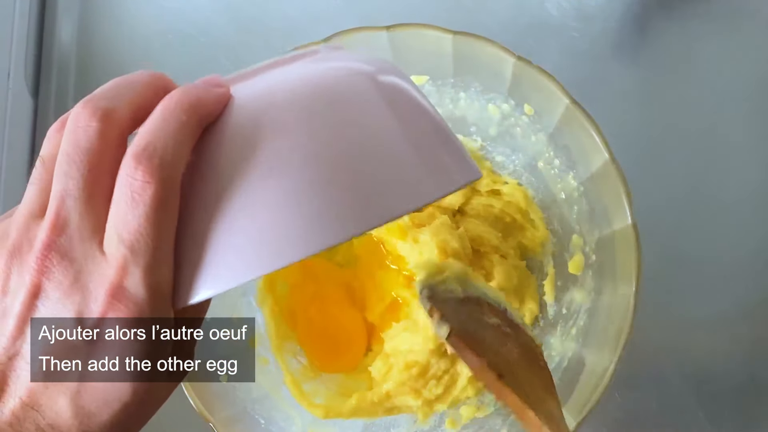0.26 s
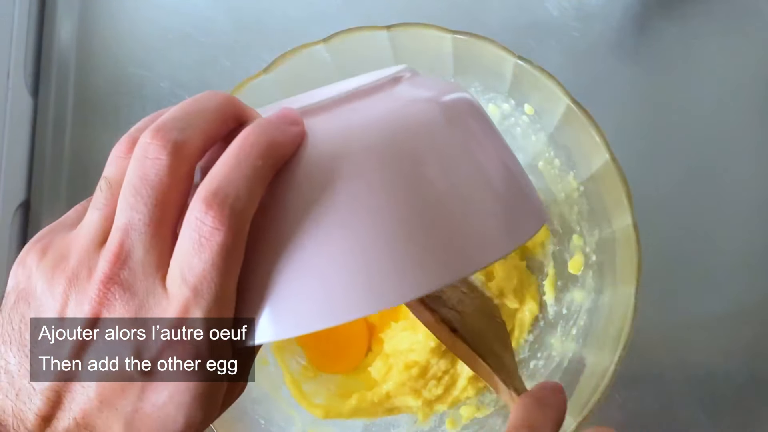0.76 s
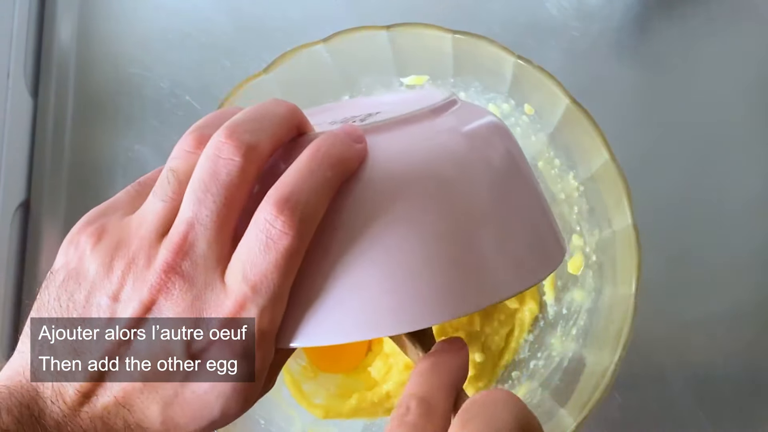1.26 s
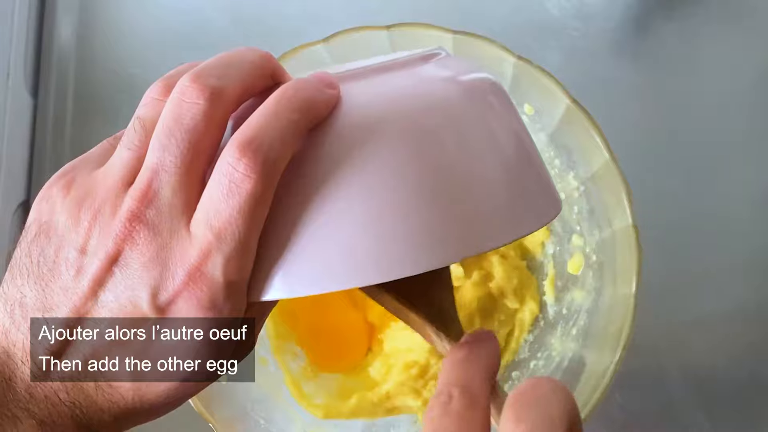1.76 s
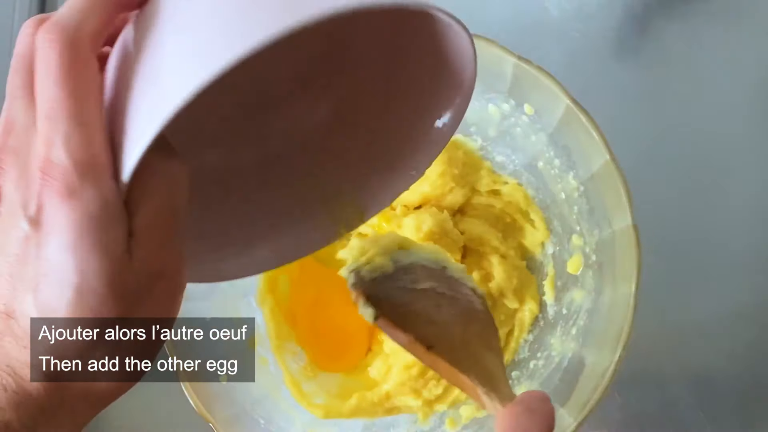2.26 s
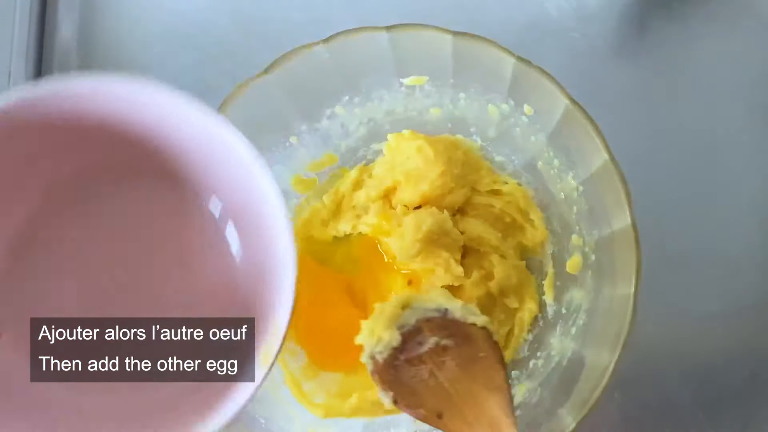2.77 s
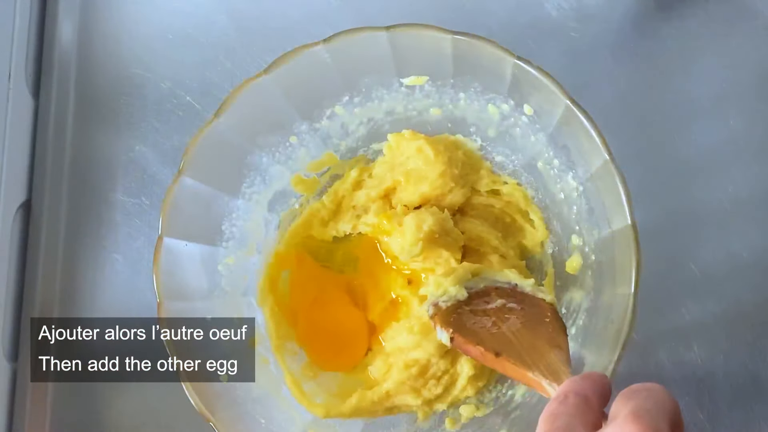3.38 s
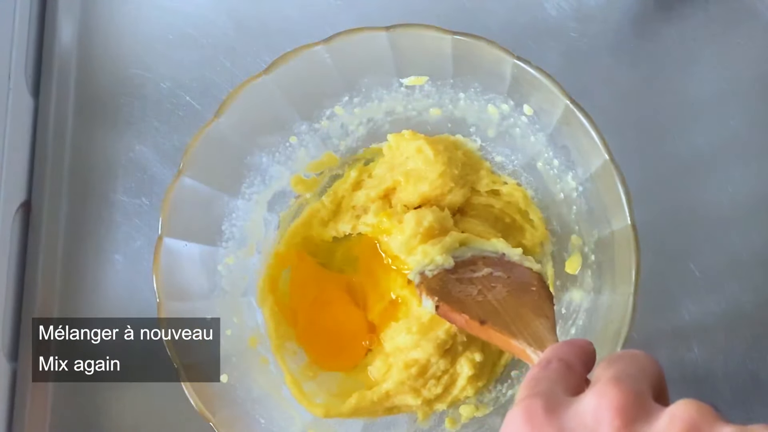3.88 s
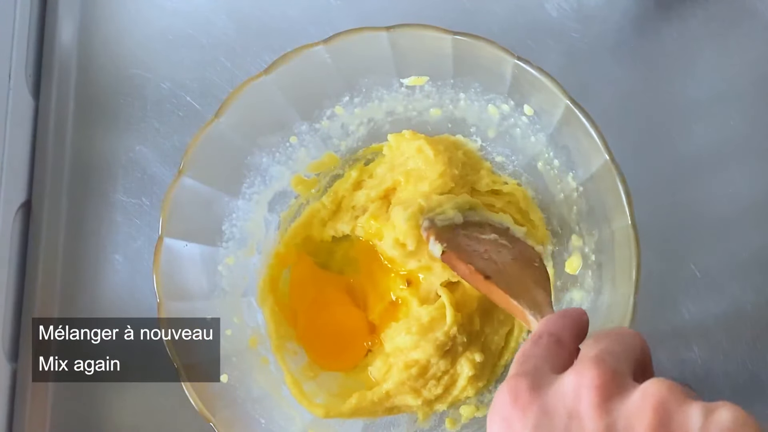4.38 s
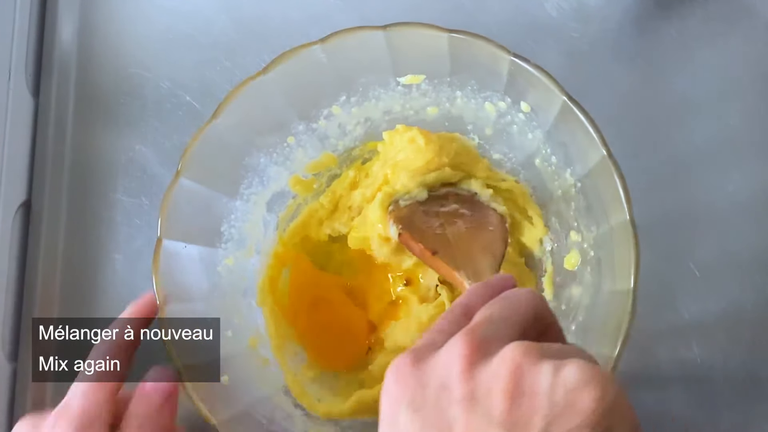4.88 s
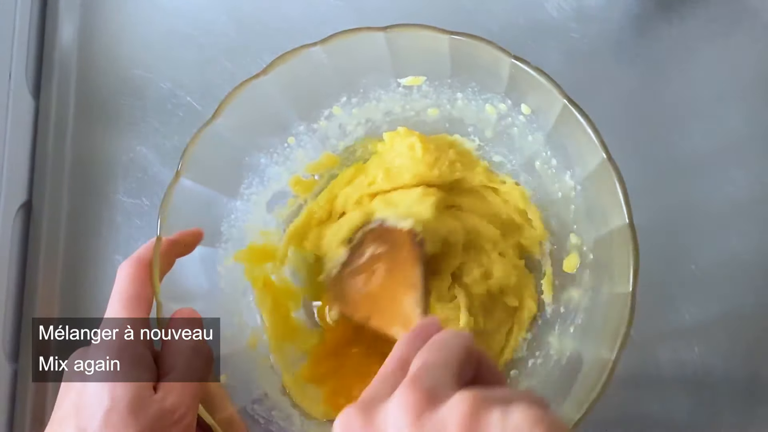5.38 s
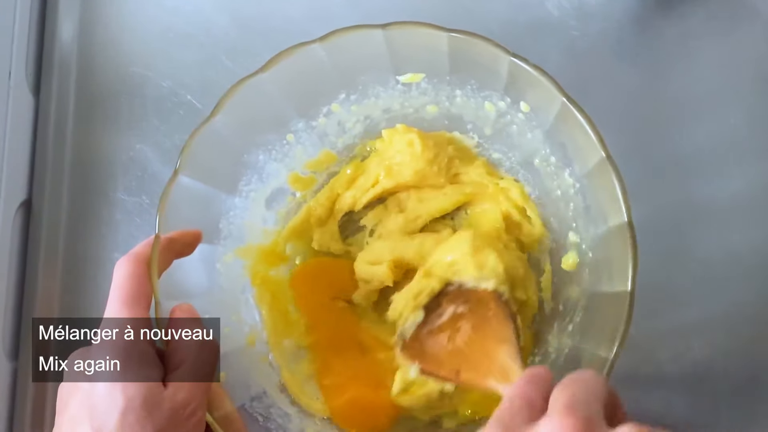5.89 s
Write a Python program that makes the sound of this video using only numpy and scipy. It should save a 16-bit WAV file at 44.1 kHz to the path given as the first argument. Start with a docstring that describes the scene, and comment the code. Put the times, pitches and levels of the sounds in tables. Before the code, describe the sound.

Very close stereo pickup of a wooden spoon in a glass bowl of sticky dough. At first there are only isolated wet pops, faint smears and fine ticks. Two double-edged knocks follow, with damped glass ringing and low counter thuds. A short slippery squeak falls between them. The last second is busier: rhythmic wet strokes, sharp sticky snaps and bowl judder, with a short room tail.

```python
"""A wooden spoon works an egg into thick dough in a glass bowl on a kitchen counter.
First the dough pops softly while the egg drains in: air pockets ring briefly and sticky films tick.
Then two stronger knocks on the glass ring the bowl and make its foot thump on the counter.
Stirring follows: tiny tears squelch, bubbles crackle, and the bowl rocks and shudders on the counter.
A short room tail, air, rumble and hum lie under it all; a close pair of microphones listens."""
import sys
import numpy as np
from scipy import signal
from scipy.fft import rfft, irfft, next_fast_len
from scipy.io import wavfile
from scipy.ndimage import map_coordinates

SR = 44100
rng = np.random.default_rng(int(sys.argv[2]) if len(sys.argv) > 2 else 0)


def digitize_waveform(pressure):
    """Quantize a signal to 16-bit integers and store it at the path in sys.argv[1].

    Rows of a 2-D input are taken as channels; values are limited to [-1, 1].
    """
    field = np.atleast_2d(pressure).T
    bounded = np.clip(field, -1, 1)
    quanta = np.round(bounded * 32767).astype(np.int16)
    wavfile.write(sys.argv[1], SR, quanta)


N = 270774  # length of the scene [samples]
TOP_HZ = 16100  # upper limit of the sound [Hz]
BUZZ_RAD, BUZZ_RATE = 0.51, 73  # unsteady phase of the ringing glass [rad], changes [per s]

# air pockets opening in the dough: (time [s], level [dB], settled pitch [Hz], time to fade by 60 dB [s])
POCKETS = [(0.268, -33.5, 880, 0.0093), (.457, -39, 554, 0.033), (.571, -45.5, 1200, 0.03),
           (.909, -30.5, 970, 0.017), (1.231, -22, 1090, 0.021), (1.299, -35, 1095, 0.033),
           (1.782, -41, 1062, 0.074), (2.255, -31.5, 1060, 0.0052), (2.596, -43, 620, 0.11),
           (2.739, -42.5, 810, 0.043), (3.017, -34, 1440, 0.0068), (3.742, -37.5, 920, .023),
           (4.344, -35.5, 1050, 0.012), (4.371, -40.5, 1210, 0.013), (4.948, -41.5, 1590, 0.0078),
           (5.135, -38, 1205, 0.022), (5.213, -35.5, 880, 0.025), (5.3651, -20.5, 830, 0.013),
           (5.433, -24, 1600, 0.036), (5.504, -41, 1150, .02), (5.5367, -37.5, 1940, 0.02),
           (5.559, -48, 790, 0.016), (5.636, -22.5, 820, 0.017), (5.798, -42, 1700, 0.025),
           (6.024, -26, 1700, 0.0085), (6.122, -40, 2120, 0.017)]
# pushes of the spoon through the dough:
# (time [s], shudder level [dB], time for the shudder to fade by 60 dB [s], wet crackle level [dB])
STROKES = [(4.084, -44.5, 0.9, -63), (5.03, -41, 0.93, -56), (5.338, -36.5, 0.94, -49),
           (5.644, -37, 0.5, -52.5), (5.968, -36.5, 1, -47)]
# ringing of the glass bowl, damped by dough: (pitch [Hz], relative level [dB], time to fade by 60 dB [s])
BOWL_MODES = [(538, -6, .17), (660, -5, .17), (755, 3, .15), (985, -1, .13), (1078, -3, .14),
              (1170, -8, .13), (1310, -6, .14), (1410, -2, .17), (1498, -7, .14), (1602, -3, .2),
              (1700, -10, .1), (1785, -10, .1), (1910, -6, .16), (2050, -8, .13), (2460, -7, .12),
              (2585, -7, .13), (2740, -8, .12), (3038, -4, .17), (3122, -3, .11), (3211, -3, .13),
              (4070, -8, .16), (4490, -8, .11), (5075, -4, .13), (5730, -12, .11), (8150, -7, .13),
              (10900, -6, .11), (12600, -6, .1)]


def knocks():
    """Wood cracks on the glass and rings the bowl's resonances, buzzing against it as it does."""
    # spoon against the bowl: (time [s], level [dB], brightness limit [Hz], build-up [s],
    # pitch favoured by the spot that is struck [Hz])
    spoon_hits = [(3.7757, -27, 3200, 0.00078, 655), (3.786, -31, 2580, 0.00069, 650),
                  (4.5025, -14.5, 18000, 0.00071, 1400), (4.512, -17.5, 4500, 0.00087, 1290),
                  (4.523, -24.5, 4000, .001, 720), (5.343, -40, 2400, 0.0017, 620),
                  (5.639, -37, 900, 0.0014, 965), (5.972, -43.5, 3020, 0.0028, 645)]
    # colour of wood on glass: (frequency [Hz], relative level [dB])
    crack_colour = [(100, -47), (400, -7), (560, -6), (760, -2), (1000, -4.5), (1450, -6), (2200, -7),
                    (3150, -6), (3900, -13), (5100, -9.5), (6300, -14.5), (8200, -9.5), (9800, -15),
                    (12500, -9.5), (16000, -20)]
    buzz_db = 3.5  # how unsteady each resonance is
    cracks, body, t = np.zeros(N), np.zeros(N), np.arange(SR // 2) / SR
    for s, glass_db, bright_hz, build_s, spot_hz in spoon_hits:
        press = amp(glass_db) * (1 - np.exp(-t / build_s))

        # a quick burst with a weaker, longer tail
        burst = fade(t, 0.025) + amp(-15.5) * fade(t, 0.19)
        crack = amp(4) * noise(crack_colour, len(t)) * burst
        crack = filtered(crack, lambda hz: favour(hz, spot_hz))

        glass = np.zeros(len(t))
        for hz, db, t60 in BOWL_MODES:
            level = favour(hz, spot_hz) * amp(db + buzz_db * wobble(BUZZ_RATE, size=len(t)))
            unsteady_phase = BUZZ_RAD * wobble(BUZZ_RATE, size=len(t))
            glass += level * fade(t, t60) * np.sin(2 * np.pi * hz * t + unsteady_phase)

        add(cracks, s, soften(crack * press, bright_hz))
        add(body, s, amp(-14) * soften(glass * press, bright_hz))
    return cracks, body


def thumps():
    """The bowl's foot slaps the counter, which rings unevenly while the foot chatters on it."""
    # the foot landing and rocking back: (time [s], level [dB], brightness limit [Hz],
    # favoured pitch [Hz], share of the counter's free fading time [fraction])
    landings = [(3.782, -17, 333, 570, 0.66), (3.794, -21, 200, 147, 0.3), (3.843, -26, 110, 130, 0.38),
                (3.895, -31.5, 101, 130, 0.63), (4.508, -11, 910, 335, 0.84), (4.543, -15.5, 334, 200, .85),
                (4.579, -18, 100, 125, 0.66), (4.627, -20, 200, 211, 0.5), (5.3499, -32.5, 260, 332, 0.67),
                (5.391, -40, 200, 200, 0.69), (5.645, -32, 260, 342, 0.41), (5.67, -35, 120, 115, 0.75),
                (5.9765, -44, 150, 190, 1)]
    # ringing of the counter: (pitch [Hz], relative level [dB], free time to fade by 60 dB [s])
    counter_modes = [(112, -6, .36), (129, 2, .44), (172, -11, .28), (192, -6, .4), (233, -11, .24),
                     (280, -7, .17), (330, -1.5, .25), (358, -10, .2), (421, -11, .3), (538, -15, .22),
                     (660, -10, .22), (745, -2.5, .19)]
    # colour of the foot rattling on the counter: (frequency [Hz], relative level [dB])
    rattle_colour = [(30, -28), (75, -3), (160, -4), (330, -2), (500, -10), (720, -8), (1500, -19.5),
                     (5000, -22), (16000, -78)]
    slap_db, slap_at_s, slap_width_s = 6, 0.00593, 0.00034  # before build-up and softening
    phase_depth_rad, level_depth_db = 0.62, 8  # how far the chatter unsettles each resonance
    random_points_per_s = 42.2  # how quickly the chatter changes
    out, t = np.zeros(N), np.arange(SR * 2 // 3) / SR
    press = 1 - np.exp(-t / 0.0012)
    no_deep_bass = signal.butter(2, 88, 'high', fs=SR, output='sos')
    slap = -amp(slap_db) * np.exp(-((t - slap_at_s) / slap_width_s) ** 2)

    def chatter():
        """A smooth random curve that grows from nothing after the landing."""
        return wobble(random_points_per_s, size=len(t)) * (1 - fade(t, 0.3))

    for s, db, bright_hz, spot_hz, free in landings:
        boom = np.zeros(len(t))
        for hz, mode_db, t60 in counter_modes:
            level = favour(hz, spot_hz) * amp(mode_db + level_depth_db * chatter())
            phase = 2 * np.pi * hz * t + phase_depth_rad * chatter()
            boom += level * fade(t, free * t60) * np.sin(phase)
        rattle = noise(rattle_colour, len(t)) * fade(t, 0.2)
        thud = slap + amp(-4.5) * boom + amp(-6) * rattle
        thud = signal.sosfilt(no_deep_bass, thud * press)
        add(out, s, amp(db) * soften(thud, bright_hz))
    return out


def pops():
    """Each air pocket rings for a few cycles as it opens, gliding up slightly, with a wet smack."""
    out, t = np.zeros(N), np.arange(SR // 5) / SR
    opening = 1 - np.exp(-t / 0.0004)
    for s, db, pitch_hz, t60 in POCKETS:
        glide = 1 - 0.034 * np.exp(-t / 0.0086)  # starts a little flat
        cavity = np.sin(2 * np.pi * pitch_hz * np.cumsum(glide) / SR) * fade(t, t60)
        hiss = rng.standard_normal(len(t))
        smack = unit(filtered(hiss, lambda hz: resonance(hz, pitch_hz, q=0.74) ** 4)) * fade(t, 0.031)
        add(out, s, amp(db) * (amp(-5) * cavity + amp(-11.5) * smack) * opening)
    return out


def squelch():
    """Each smear of dough is a quick swell and slower ebb of tiny tears."""
    out = np.zeros(N)
    for s, db, centre_hz, length in smears():
        u = np.arange(int(3 * length * SR)) / (length * SR)  # time in smear lengths
        swell = (1 - np.exp(-u / 0.029)) * np.exp(-u ** 2)
        add(out, s, amp(db - 6.5) * tears(len(u), centre_hz) * swell)
    return out


def smears():
    """List all that tears the dough, as (time [s], level [dB], centre [Hz], length [s])."""
    # dough slumping off the spoon: (time [s], level [dB], centre [Hz], length [s])
    slumps = [(.448, -49.5, 680, 0.057), (.612, -52, 333, .03), (.737, -47.5, 375, 0.019),
              (1.362, -42.5, 373, 0.035), (1.665, -47, 660, 0.055), (2.085, -43.5, 410, 0.046),
              (2.401, -50, 750, 0.086), (2.96, -51, 474, .035), (3.315, -52, 820, 0.053),
              (3.64, -50.5, 645, 0.05), (4.043, -44, 675, .07), (5.385, -45, 600, .035)]
    # the wet spoon sliding on the glass: (time [s], level [dB], centre [Hz], length [s])
    slides = [(.275, -68, 1320, 0.068), (.56, -64, 1000, 0.082), (.925, -54, 1000, 0.058),
              (1.232, -61, 2050, 0.025), (1.293, -57, 3900, 0.019), (1.303, -56, 2200, 0.019),
              (2.264, -53, 1240, 0.086), (2.3, -57, 2200, 0.025), (3.025, -55.5, 1420, 0.046),
              (3.282, -57.5, 2300, 0.08), (3.526, -52, 1530, 0.054), (3.985, -44.5, 1790, 0.048),
              (4.018, -50, 2200, 0.047), (4.056, -47, 2000, 0.051), (4.001, -51, 6550, 0.078),
              (4.756, -47, 8900, 0.051), (5.343, -52, 3200, .035), (5.435, -54, 2400, 0.078),
              (5.676, -51, 4540, .025), (5.741, -50, 12700, 0.041), (5.747, -73, 2380, 0.042),
              (6.025, -70, 1990, 0.057)]

    # a push squeezes the bulk of the dough and peels it off the glass
    squeezed = [(s, shudder_db - 8, 620, 0.064) for s, shudder_db, _, _ in STROKES]
    peeled = [(s, wet_db - 3.5, 2300, 0.088) for s, _, _, wet_db in STROKES]

    # dough tears round each opening pocket, more strongly round a louder one
    torn = [(s, -43 + 0.42 * db, 1.05 * hz, 0.06) for s, db, hz, _ in POCKETS]

    # dough creeps round the spoon at random moments
    creeps_per_s, weakest_db, range_db = 9, -62, 7
    lowest_hz, range_octaves, creep_s = 600, 1.8, 0.022
    crept = []
    for when, size, pitch in rng.random((int(creeps_per_s * N / SR), 3)):
        centre_hz = lowest_hz * 2 ** (range_octaves * pitch)
        crept.append((when * N / SR, weakest_db + range_db * size, centre_hz, creep_s))
    return squeezed + peeled + torn + crept + list(slumps) + list(slides)


def tears(size, centre_hz):
    """Tiny tears at random moments, each a few cycles at its own pitch, scaled to rms 1."""
    tears_per_s, pitch_spread, swell_cycles, size_db = 1500, 0.3, 0.82, 2.5  # spread is of log pitch
    t = np.arange(SR // 50) / SR
    count = int(tears_per_s * size / SR)
    start = rng.integers(size, size=(count, 1))
    pitch, height = rng.standard_normal((2, count, 1))
    hz = np.minimum(centre_hz * np.exp(pitch_spread * pitch), TOP_HZ)
    u = hz * t / swell_cycles
    grains = amp(size_db * height) * np.sqrt(hz) * u * np.exp(-u) * np.sin(2 * np.pi * hz * t)
    places = start + np.arange(len(t))
    return unit(np.bincount(places.ravel(), grains.ravel(), size)[:size])


def snaps():
    """Films of egg stretch and part: one sharp tick, then a brief spatter."""
    # the loudest sticky films snapping: (time [s], level [dB], centre [Hz])
    films = [(0.088, -44.5, 9000), (0.194, -46, 6000), (.423, -42.5, 7040), (1.233, -47, 3680),
             (1.4679, -35.5, 11500), (1.651, -38, 8200), (2.286, -47, 7960), (2.507, -47, 5970),
             (4.878, -39.5, 12160), (4.9761, -42.5, 8840), (5.008, -42, 11000), (5.03, -41, 12000),
             (5.059, -30, 6400), (5.087, -37, 12000), (5.098, -35.5, 12400), (5.142, -35.5, 3900),
             (5.1794, -38, 4900), (5.196, -35, 10100), (5.25, -26.5, 3900), (5.258, -30.5, 4360),
             (5.322, -44, 8000), (5.375, -32, 7000), (5.412, -54, 9000), (5.433, -28, 2950),
             (5.475, -17, 7500), (5.601, -35, 10000), (5.675, -22, 6500), (5.752, -39, 12000),
             (5.7696, -39, 13000), (5.799, -46, 12000), (5.885, -35, 3700), (5.905, -40.5, 6670),
             (6.024, -25, 3930), (6.08, -41, 5500)]
    out, t = np.zeros(N), np.arange(SR // 20) / SR
    for s, db, centre_hz in films:
        spatter = rng.standard_normal(len(t)) * (amp(-14) * fade(t, 0.011) + amp(-27) * fade(t, 0.05))
        click = t == 0  # a single sample
        # a broad peak round the centre, with the extreme treble rolled off
        tick = filtered(click + spatter, lambda hz: (resonance(hz, centre_hz, q=0.53) ** 2
                                                     / (1 + (hz / 14500) ** 8)))
        add(out, s, amp(db - 25) * unit(tick))
    return out


def crackle():
    """Tiny bubbles of all sizes burst at random as short rings, louder while the spoon stirs."""
    rest_db, settle_s = -69, 1  # bubbles at rest; time to fade by 60 dB after a push
    out, t = np.zeros(N), np.arange(SR // 100) / SR
    gain = amp(rest_db) + sum(amp(wet_db) * push(s, settle_s) for s, _, _, wet_db in STROKES)
    for when, size, pitch in rng.random((900, 3)):
        hz = 1500 * 8 ** pitch
        # the fourth power makes strong bursts rare
        height = gain[int(when * N)] * amp(6 + 13 * size ** 4) * np.sqrt(hz / 6000)
        add(out, when * N / SR, height * np.sin(2 * np.pi * hz * t) * fade(t, 7 / hz))
    return out


def shudder():
    """The dragging spoon makes bowl and counter judder at their lowest resonance, over a dull rub."""
    # colour of the rub: (frequency [Hz], relative level [dB])
    rub_colour = [(30, -2), (60, 5.5), (140, 3), (220, 3), (380, -9), (700, -20), (1500, -33), (5000, -37)]
    judder_hz = 111 * (1 + 0.0557 * wobble(22))
    judder = np.sin(2 * np.pi * np.cumsum(judder_hz) / SR) * amp(3.4 * wobble(30))
    force = sum(amp(db) * push(s, t60) for s, db, t60, _ in STROKES)
    return force * (amp(3.5) * judder + amp(-3) * noise(rub_colour, N))


def push(s, t60):
    """The force of one stroke: it rises, holds and eases off."""
    rise_s, hold_s = 0.019, 0.023
    t = np.arange(N) / SR - s
    return np.clip(t / rise_s, 0, 1) * fade(np.maximum(t - rise_s - hold_s, 0), t60)


def squeaks():
    """Wood sticks and slips on the wet glass: a short, rough, gliding note."""
    # squeaks of the spoon: (time [s], level [dB], start pitch [Hz], end pitch [Hz], length [s])
    squeak_notes = [(1.466, -55.5, 3083, 3133, .04), (3.983, -49.5, 1780, 1700, 0.0084),
                    (3.992, -49, 2160, 2300, 0.0098), (4.007, -48, 1515, 1880, 0.018),
                    (4.016, -45.5, 2220, 1920, 0.018), (5.75, -59, 2494, 2260, 0.037)]
    rough_rad, rough_db, rough_rate = 1, 1, 380  # uneven phase, level, changes per s
    out = np.zeros(N)
    for s, db, start_hz, end_hz, length in squeak_notes:
        u = np.linspace(0, 1, int(length * SR))
        pitch_hz = start_hz + (end_hz - start_hz) * u
        phase = 2 * np.pi * np.cumsum(pitch_hz) / SR + rough_rad * wobble(rough_rate, size=len(u))
        level = amp(db + rough_db * wobble(rough_rate, size=len(u)))
        add(out, s, level * np.sin(np.pi * np.sqrt(u)) * np.sin(phase))
    return out


def pings():
    """One resonance of the glass sings on faintly after the spoon lets go."""
    # singing notes: (time [s], level [dB], pitch [Hz], time to fade by 60 dB [s])
    singing_notes = [(0.271, -60, 1405, 0.3), (4.37, -52.5, 1394, 0.36), (5.433, -52, 1611, 0.52)]
    out, t = np.zeros(N), np.arange(SR // 2) / SR
    for s, db, hz, t60 in singing_notes:
        phase = 2 * np.pi * hz * t + BUZZ_RAD * wobble(BUZZ_RATE, size=len(t))
        add(out, s, amp(db) * (1 - np.exp(-t / 0.0049)) * fade(t, t60) * np.sin(phase))
    return out


def through_glass(x):
    """Pops against the wall set the bowl's resonances faintly ringing."""
    glass = ring(BOWL_MODES, np.arange(SR // 2) / SR, scatter_db=2)
    return signal.fftconvolve(x, glass / np.linalg.norm(glass))[:N]


def kitchen(x):
    """The walls answer with a short diffuse tail: noise that fades at its own pace at each pitch."""
    # fading of the room: (frequency [Hz], time to fade by 60 dB [s])
    room_fading = [(100, .85), (350, .62), (1500, .55), (5000, .47), (14000, .3)]
    hz, t, z = signal.stft(rng.standard_normal((2, SR * 3 // 4)), SR, nperseg=256)
    fading = fade(t, along(room_fading, hz)[:, None])
    tail = spread(signal.istft(z * fading, SR, nperseg=256)[1])
    tail = tail * (1 - np.exp(-np.arange(tail.shape[1]) / SR / 0.00019))
    return signal.fftconvolve(x[None], tail / np.linalg.norm(tail[0]), axes=1)[:, :N]


def background():
    """Room air as wide noise, with a gently uneven low rumble and a faint appliance hum."""
    # colour of the room air: (frequency [Hz], relative level [dB])
    air_colour = [(20, -49), (45, 4.5), (70, 3.5), (110, 5), (300, -3), (550, -9), (1100, -15),
                  (1700, -20.5), (3100, -23), (3700, -27.5), (5000, -26), (8000, -34), (12500, -34),
                  (16000, -44)]
    air = spread(np.array([noise(air_colour, N), noise(air_colour, N)]))
    air = air * amp(-52 + 0.45 * wobble(13))
    # (frequency [Hz], relative level [dB])
    rumble_colour = [(50, -47), (100, 21.5), (170, -25), (290, 15), (450, 5), (900, -27), (3000, -57)]
    rumble = noise(rumble_colour, N) * amp(-59.5 + 3 * wobble(16))
    hum_hz = 49.3 + 0.86 * wobble(3.26)
    hum = np.sin(2 * np.pi * np.cumsum(hum_hz) / SR)
    return air + rumble + amp(-55) * hum


def favour(hz, spot_hz):
    """The spot of contact brings out one range of resonances: gain at each frequency."""
    boost_db, width_octaves = 5.5, 0.59
    return amp(boost_db * np.exp(-(np.log2((hz + 1) / spot_hz) / width_octaves) ** 2))


def soften(x, corner_hz):
    """A cushion of dough takes the edge off a blow: a gentle low-pass."""
    return filtered(x, lambda hz: 1 / (1 + 1j * hz / corner_hz))


def ring(modes, t, scatter_db):
    """Fading sine tones, each at a slightly random strength."""
    return sum(amp(db + scatter_db * rng.normal()) * fade(t, t60) * np.sin(2 * np.pi * hz * t)
               for hz, db, t60 in modes)


def resonance(hz, centre_hz, q):
    """A causal band-pass response, narrower for a higher q."""
    return 1 / (1 + 1j * q * (hz / centre_hz - centre_hz / (hz + 1)))


def fade(t, t60):
    """Exponential fading, down by 60 dB at t60 seconds."""
    return np.exp(-np.log(1000) * t / t60)


def noise(spectrum, size):
    """Coloured noise of rms 1."""
    return unit(filtered(rng.standard_normal(size), lambda hz: amp(along(spectrum, hz))))


def wobble(rate, size=N):
    """A smooth random curve through `rate` random points a second."""
    points = rng.standard_normal(int(size * rate / SR) + 4)
    return map_coordinates(points, [np.arange(size) * rate / SR])


def filtered(x, response):
    """Multiply the spectrum of x by a response of frequency."""
    n = x.shape[-1]
    m = next_fast_len(n + SR // 4)  # spare room for the filter's tail
    return irfft(rfft(x, m) * response(np.fft.rfftfreq(m, 1 / SR)), m)[..., :n]


def along(points, hz):
    """Read a curve of (frequency [Hz], value) points on a log frequency axis."""
    f, v = np.transpose(points)
    return np.interp(np.log(hz + 1), np.log(f + 1), v)


def amp(db):
    """Turn decibels into a factor."""
    return 10 ** (np.asarray(db) / 20)


def unit(x):
    """Scale a signal to rms 1."""
    return x / np.sqrt(np.mean(x ** 2) + 1e-20)


def add(track, s, sound):
    """Mix a sound into a track at time s, cutting off what runs past the end."""
    part = track[round(s * SR):][:len(sound)]
    part += sound[:len(part)]


def spread(pair):
    """Blend two unrelated signals into a diffuse field at the two microphones."""
    # how alike left and right are: (frequency [Hz], likeness [0 to 1])
    likeness = [(100, 1), (250, 0.92), (620, 0.18), (1100, 0.6), (1600, 0.24), (2200, 1), (5500, 0.72),
                (7400, .999), (9000, 0.64), (13500, 0.9), (16000, 0.59)]

    def blend(hz):
        """Shares of the common and the opposite part."""
        turn = np.arccos(np.clip(along(likeness, hz), -1, 1)) / 2
        return np.array([np.cos(turn), np.sin(turn)])

    mid, side = filtered(pair, blend)
    return np.array([mid + side, mid - side])


def scene():
    """Mix the spoon, bowl, counter and dough with the room's answer and background."""
    cracks, body = knocks()
    counter = thumps()
    pockets = pops()
    ticks = snaps() + crackle()
    wet = squelch() + squeaks()
    glass = amp(-24) * through_glass(pockets) + pings()
    to_room = amp(-6) * cracks + amp(-21) * body + amp(-16) * counter
    to_room = to_room + amp(-11.5) * pockets + amp(-8.5) * ticks + amp(-5) * wet
    close = cracks + body + counter + pockets + glass + ticks + wet + shudder()
    return close + kitchen(to_room) + background()


def record(dry):
    """The two microphones differ in phase and slightly in level; a steep filter limits the treble."""
    # phase between the microphones: (frequency [Hz], lead of the left one [rad])
    left_lead = [(0, 0), (1550, -0.3), (2410, 0.6), (3450, 0.1), (4390, 0.7), (5340, 0.4), (6800, 2.9),
                 (8100, 3.6), (9990, 6.2), (11000, 6.6), (13000, 9.2), (14400, 9.7), (15800, 12.4),
                 (16600, 12.6)]
    balance = [(50, 1), (300, -3), (1000, -0.5), (2000, 0.6)]  # (frequency [Hz], left over right [dB])
    sides = np.array([[1], [-1]])  # each side takes half the difference

    def microphones(hz):
        """Phase and level of each microphone."""
        lead = np.interp(hz, *np.transpose(left_lead))
        return np.exp(1j * lead * sides / 2) * amp(along(balance, hz) * sides / 2)

    pair = filtered(dry, microphones)
    return filtered(pair, lambda hz: 1 / np.sqrt(1 + (hz / TOP_HZ) ** 120))


dry = scene()
out = record(dry)
digitize_waveform(out)
```